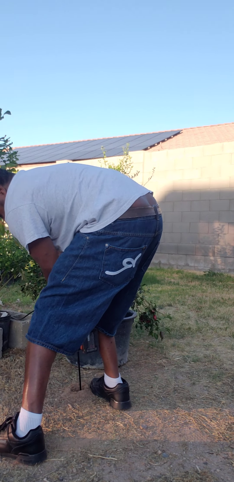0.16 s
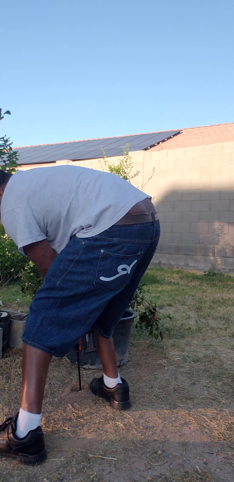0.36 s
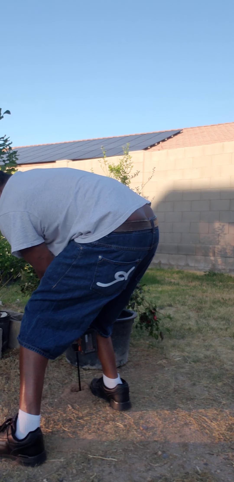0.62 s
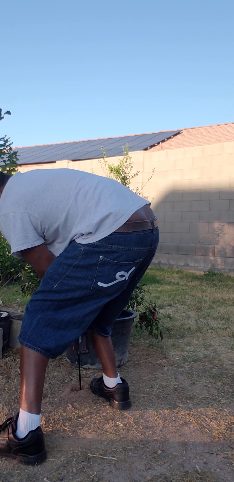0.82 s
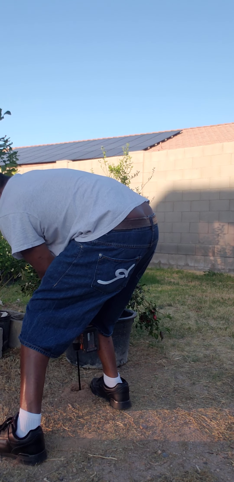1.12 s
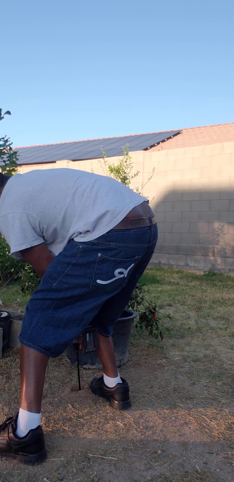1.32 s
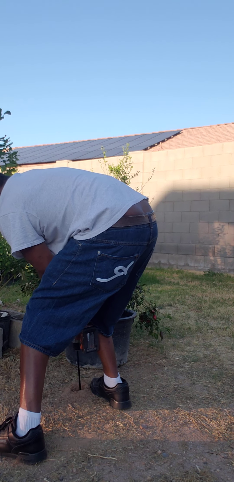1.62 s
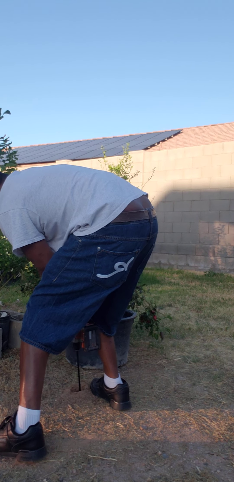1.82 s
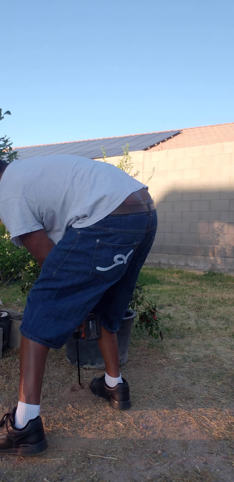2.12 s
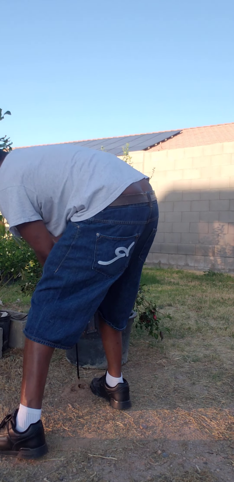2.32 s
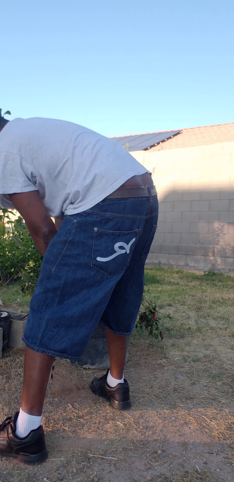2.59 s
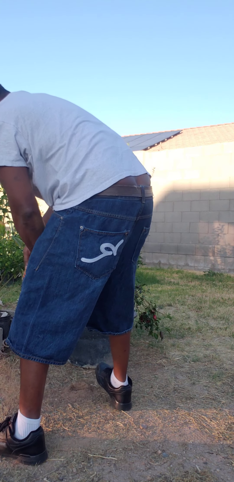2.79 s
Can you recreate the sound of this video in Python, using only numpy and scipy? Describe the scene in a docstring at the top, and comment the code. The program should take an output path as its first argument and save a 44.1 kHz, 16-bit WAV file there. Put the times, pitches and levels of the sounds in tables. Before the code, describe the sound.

A cordless drill grinds an auger into hard dry soil, spins free and clicks off.

```python
"""A machine hums and a far engine drones in a walled yard; a tool clicks as it is handled.
Then a cordless drill whirrs up and turns an auger in hard dry soil. Grit scrapes and rings the steel bit,
earth crumbles, a few stones crack and the bit squeaks on them, until it spins free and stops with a click.
A shoe scuffs the dirt. The wall sends a faint, quick echo of the work back to the microphones."""
import sys
import numpy as np
from scipy import signal
from scipy.fft import rfft, irfft, next_fast_len
from scipy.io import wavfile

SR = 44100
rng = np.random.default_rng(int(sys.argv[2]) if len(sys.argv) > 2 else 0)


def transcribe(signal):
    """Save signal, clipped to [-1, 1], as a 16-bit WAV file at the path in sys.argv[1]."""
    frames = np.atleast_2d(signal).T
    limited = np.clip(frames, -1, 1)
    pcm = np.round(limited * 32767).astype(np.int16)
    wavfile.write(sys.argv[1], SR, pcm)


N = 130095
T = np.arange(N) / SR
SIZE = 2 * next_fast_len(N // 2 + 8192)
HZ = np.maximum(np.arange(SIZE // 2 + 1) * SR / SIZE, 1)
GRAINS_PER_S, CRUMB_SPREAD_DB, BURST_ATTACK_S = 14000, 2.5, 0.00082

# Bright scraping grit and duller crumbling earth. Each row: frequency in Hz, relative level in dB.
GRIT_COLOUR = [(300, -38), (900, -32.5), (1800, -10), (2400, -16), (3300, -5.5), (3900, -5), (4600, 0),
               (5200, -2), (5700, -6.5), (6500, -7.5), (8200, -24), (9400, -11.5), (11000, -18),
               (13800, -21)]
CRUMB_COLOUR = [(120, -5.5), (300, 1), (450, 7), (700, -2.5), (950, 0), (1200, 4), (1450, -1.5),
                (1700, -5.5), (2400, -1.5), (4000, 1), (9000, -46)]
# The ground's dull knock. Each row: frequency in Hz, width in Hz, gain in dB.
THUD_MODES = [(193, 97, -15), (446, 64, -9), (675, 155, -2), (1030, 270, -5.5)]


def from_db(db):
    """Decibels to gain."""
    return 10 ** (np.asarray(db) / 20)


def rms_one(x):
    """Scale to an rms of one."""
    return x / np.sqrt(np.mean(x ** 2) + 1e-20)


def gain_in_time(rows):
    """A level curve as a gain at every sample, silent before and after."""
    s, db = np.transpose(rows)
    return from_db(np.interp(T, s, db)) * (T >= s[0]) * (T <= s[-1])


def over_hz(points):
    """A table joined by straight lines in log frequency."""
    hz, value = np.transpose(points)
    return np.interp(np.log(HZ), np.log(hz), value)


def swell(s, width_s):
    """A smooth rise and fall around a moment."""
    return np.exp(-((T - s) / width_s) ** 2 / 2)


def burst(s, decay_s):
    """A quick rise and an exponential fall."""
    age = np.maximum(T - s, 0)
    return np.minimum(age / BURST_ATTACK_S, 1) * np.exp(-np.minimum(age / decay_s, 50))


def drift(rate_hz):
    """Random wander with an rms of one, mostly slower than the given rate."""
    return rms_one(irfft(rfft(rng.standard_normal(SIZE)) / (1 + (HZ / rate_hz) ** 2))[:N])


def colour(x, spectrum):
    """Causal filter of the given colour that keeps the power of white noise."""
    cepstrum = irfft(np.log(rms_one(from_db(over_hz(spectrum)))))
    cepstrum[1:SIZE // 2] *= 2
    cepstrum[SIZE // 2 + 1:] = 0
    return irfft(rfft(x, SIZE) * np.exp(rfft(cepstrum)))[..., :N]


def resonate(x, hz, width_hz):
    """One resonance."""
    r = np.exp(-np.pi * width_hz / SR)
    return signal.lfilter([1, 0, -1], [1, -2 * r * np.cos(2 * np.pi * hz / SR), r * r], x)


def noise():
    """Two unrelated white noises."""
    return rng.standard_normal((2, N))


def narrow_noise(hz, width_hz):
    """Noise twice through one resonance."""
    return rms_one(resonate(resonate(noise(), hz, width_hz), hz, width_hz))


def grains(per_s, spread_db):
    """Random tiny impacts, many weak and a few strong."""
    sizes = from_db(spread_db * np.minimum(rng.exponential(1, N), 5))
    return rms_one((rng.random(N) < per_s / SR) * sizes * rng.choice([-1, 1], (2, N)))


def strike(blows, modes):
    """Blows, each a time in seconds and a level in dB, ring a body's modes; all mid, no side."""
    hits = np.zeros(N)
    for s, db in blows:
        hits[int(s * SR)] += from_db(db)
    ring = sum((-1) ** k * from_db(db) * resonate(hits + 1e-18, hz, width)
               for k, (hz, width, db) in enumerate(modes))
    return np.array([ring / 2, np.zeros(N)])


def delayed(x, s):
    """The signal s seconds later."""
    return irfft(rfft(x, SIZE) * np.exp(-2j * np.pi * HZ * s))[:N]


def at_microphones(pair):
    """Mid and side become left and right: alike in the bass, diffuse in the treble, leaning left."""
    # Each row: frequency in Hz, likeness of left and right (1 or more is fully alike).
    likeness = [(70, 1.7), (140, 0.83), (700, 0.86), (1600, 0.74), (2600, 0), (5000, -0.16), (15000, 0.12)]
    # Each row: frequency in Hz, left minus right in dB.
    balance = [(60, 3.5), (99, -2.5), (160, 1.5), (270, -0.5), (450, 5), (1220, 6.5), (3330, -0.5),
               (5500, 2)]
    mid, side = rfft(pair, SIZE)
    alike, sign = np.clip(over_hz(likeness), -1, 1), np.array([[1], [-1]])
    both = np.sqrt((1 + alike) / 2) * mid + sign * np.sqrt((1 - alike) / 2) * side
    return irfft(both * from_db(sign * over_hz(balance) / 2))[:, :N]


def yard_air():
    """Low rumble and faint hiss all around; the rumble swells once, briefly."""
    # Each row of both: frequency in Hz, relative level in dB.
    rumble_colour = [(12, -51), (26, -42), (37, 9), (60, -2.5), (115, -2.5), (170, -7), (250, -12.5),
                     (350, -23), (650, -38), (950, -26.5), (1300, -41.5), (3000, -74), (8000, -87)]
    hiss_colour = [(1000, -11), (2800, -12.5), (3600, -2), (4350, -11.5), (5100, 1), (5900, -19.5),
                   (6400, -13), (8000, -24.5), (12000, -14), (15500, -16.5)]
    rumble = from_db(-53) * colour(noise(), rumble_colour)
    hiss = from_db(-74) * colour(noise(), hiss_colour)
    bump = from_db(-46.5) * narrow_noise(hz=103, width_hz=48) * swell(s=1.23, width_s=.05)
    return at_microphones(rumble + hiss + bump)


def far_engine():
    """In the distance an engine drones on one low tone that glides up, then sinks and fades."""
    # Each row: time in seconds, pitch in Hz, rms level in dB.
    glide = [(0, 54.55, -67), (.35, 56.53, -47), (.7, 62.27, -45.5), (1.1, 65.1, -43), (1.32, 62.7, -50.5),
             (1.48, 62.37, -42.5), (1.8, 57.14, -48.5), (2.15, 52.5, -58), (2.55, 43.66, -61),
             (2.95, 41.3, -65)]
    s, hz, db = np.transpose(glide)
    phase = 2 * np.pi * np.cumsum(np.interp(T, s, hz)) / SR
    return np.sqrt(2) * from_db(np.interp(T, s, db)) * np.sin(phase)


def machine_hum(waver_db=1.0):
    """Behind the work a machine hums at a steady pitch, each tone wavering a little in level."""
    # Each row: frequency in Hz, rms level in dB.
    tones = [(75.4, -52.5), (150.8, -70.5), (263.8, -75.5), (942, -79)]
    return np.sqrt(2) * sum(from_db(db + waver_db * drift(0.73)) * np.sin(2 * np.pi * hz * T)
                            for hz, db in tones)


def shoe_scuff():
    """A soft crunch of earth and grit under a shifting sole."""
    crunch = grains(GRAINS_PER_S, CRUMB_SPREAD_DB) * swell(s=2.905, width_s=0.023)
    return from_db(-56.5) * colour(crunch, CRUMB_COLOUR) + from_db(-52.5) * colour(crunch, GRIT_COLOUR)


def tool_clicks():
    """Handled or stopped, the tool's play closes: a sharp tick, a rattle, a faint knock on the ground."""
    # Each row: start in seconds, tick, rattle and thud levels in dB, rattle decay in seconds.
    clicks = [(0.089, -43, -55, -79, 0.014), (.121, -50, -60.5, -74, 0.021), (.307, -39, -60, -76, 0.0018),
              (2.6803, -12.5, -29, -46.5, 0.0014), (2.697, -42, -42, -49, 0.0058),
              (2.858, -26, -48, -62, 0.0012), (2.89, -26, -64, -48, 0.0015)]
    # Each row: frequency in Hz, relative level in dB.
    click_colour = [(2500, -13.5), (5800, 4.5), (8200, -16), (9800, -9), (12500, -21)]
    contacts, thuds = np.zeros((2, N)), []
    for s, tick_db, rattle_db, thud_db, decay_s in clicks:
        contacts += from_db(rattle_db) * burst(s, decay_s) * noise()
        contacts[0, int(s * SR)] += from_db(tick_db)
        thuds.append((s, thud_db))
    return colour(contacts, click_colour) + strike(thuds, THUD_MODES)


def bit_squeaks(attack_s=0.0045, decay_s=0.0053, wobble=0.0084):
    """Steel sticks and slips on a stone; the third harmonic, near a mode of the bit, can shriek."""
    # Each row: start and hold in seconds, slip rate in Hz, fundamental and overtone gains in dB.
    squeaks = [(1.114, 0.044, 1479, -48, -57), (1.393, 0.0078, 1390, -41.5, -18.5)]
    # Each row: multiple of the slip rate, relative level in dB.
    harmonics = [(2, -23.5), (3, -1), (4, -26), (6, -27.5), (7, -22), (8, -28.5)]
    sound = np.zeros(N)
    for s, hold_s, hz, db, overtones_db in squeaks:
        age = np.maximum(T - s, 0)
        shape = np.minimum(age / attack_s, 1) * np.exp(-np.clip((age - hold_s) / decay_s, 0, 50))
        phase = 2 * np.pi * np.cumsum(hz * (1 + wobble * drift(190))) / SR
        overtones = sum(from_db(level_db) * np.sin(k * phase) for k, level_db in harmonics)
        sound += shape * (from_db(db) * np.sin(phase) + from_db(overtones_db) * overtones)
    return sound


def stone_cracks():
    """Stones and clods fracture with a bright snap and a darker crunch; the jolt knocks ground and shaft."""
    # Each row: start in seconds, snap, crunch, thud and clank levels in dB, fracture decay in seconds.
    cracks = [(0.9095, -24, -41, -25.5, -13.5, 0.0028), (1.2734, -23, -36, -35.5, -25, 0.0021),
              (1.2854, -47, -26, -28, -31, 0.0029), (1.3025, -17.5, -17, -21, -20, 0.0021),
              (1.332, -50, -30, -40, -37, 0.0032), (1.6499, -29.5, -25.5, -48, -38, 0.0038),
              (1.668, -51, -31.5, -35, -32, 0.011), (1.76, -41, -42, -37.5, -32, 0.0033)]
    # Each row of both: frequency in Hz, relative level in dB.
    snap_colour = [(500, -27), (2500, -11), (4600, 5), (6300, -11.5), (8300, -13), (9800, -3), (15000, -28)]
    crunch_colour = [(300, -18), (900, -13.5), (1250, -3.5), (3000, 4.5), (4200, 9), (6500, -29)]
    # The shaft's hollow clank, damped by the soil. Each row: frequency in Hz, width in Hz, gain in dB.
    clank_modes = [(1590, 300, -6.5), (2120, 200, -8), (2580, 150, -5), (4370, 120, -6), (5610, 140, -6.5)]
    snap, crunch = np.zeros((2, N))
    thuds, clanks = [], []
    for s, snap_db, crunch_db, thud_db, clank_db, decay_s in cracks:
        snap += from_db(snap_db) * burst(s, decay_s)
        crunch += from_db(crunch_db) * burst(s, decay_s)
        thuds.append((s + BURST_ATTACK_S, thud_db))
        clanks.append((s + BURST_ATTACK_S, clank_db))
    fractures = rng.choice([-1, 1], (2, 2, N))
    knocks = strike(thuds, THUD_MODES) + strike(clanks, clank_modes)
    return colour(snap * fractures[0], snap_colour) + colour(crunch * fractures[1], crunch_colour) + knocks


def grinding():
    """Grit scrapes along the steel in small clumps and sets it ringing; duller crumbs break off."""
    # How hard the bit grinds and the earth crumbles. Each row of both: time in seconds, level in dB.
    grit_level = [(.78, -65), (.835, -48), (.9, -45), (.985, -38), (1.03, -41.5), (1.095, -33),
                  (1.17, -39.5), (1.24, -44), (1.285, -28.5), (1.33, -38), (1.38, -34), (1.43, -40.5),
                  (1.51, -36.5), (1.6, -45.5), (1.645, -37.5), (1.672, -35.5), (1.7, -38), (1.75, -35.5),
                  (1.83, -39.5), (1.888, -35), (1.908, -47.5), (1.95, -52)]
    crumb_level = [(.8, -87), (.85, -81), (.9, -59), (.94, -46), (1.0, -57), (1.14, -51), (1.23, -67),
                   (1.3, -47), (1.345, -50), (1.38, -45.5), (1.43, -57.5), (1.51, -54), (1.6, -68),
                   (1.675, -46), (1.71, -57.5), (1.76, -56.5), (1.82, -56), (1.88, -57), (1.94, -63)]
    # The steel bit's ring. Each row: frequency in Hz, width in Hz, level against the grit in dB.
    bit_modes = [(1440, 46, -22.5), (4350, 17, -19), (4520, 47, -18.5), (4800, 12, -16.5), (4950, 58, -17)]
    grit = grains(GRAINS_PER_S, spread_db=0.5) * from_db(1.08 * drift(39))
    ringing = sum(from_db(db + 2.6 * drift(3.7)) * rms_one(resonate(grit, hz, width))
                  for hz, width, db in bit_modes)
    scrape = (colour(grit, GRIT_COLOUR) + ringing) * gain_in_time(grit_level)
    crumbs = grains(per_s=2500, spread_db=CRUMB_SPREAD_DB) * from_db(2 * drift(41))
    return scrape + colour(crumbs * gain_in_time(crumb_level), CRUMB_COLOUR)


def drill(spin_up_at_s=0.81, spin_up_length_s=0.093, dull_hz=7400):
    """Motor, fan and gears whirr, dull until up to speed, with a thin whine and, running free, a ring."""
    # Each row of all three: time in seconds, level in dB.
    whirr_level = [(.72, -80), (.76, -58), (.84, -43), (1.9, -51), (1.96, -45.5), (2.1, -44), (2.64, -47.5),
                   (2.7, -45.5), (2.73, -54), (2.84, -57.5), (2.95, -67)]
    whine_level = [(.73, -78), (.79, -78), (1.1, -61), (1.93, -79), (2.06, -57), (2.4, -65), (2.73, -78)]
    ring_level = [(1.9, -61), (2.24, -44), (2.4, -52.5), (2.7, -52.5)]
    # Each row: frequency in Hz, relative level in dB.
    whirr_colour = [(550, -15), (900, -8.5), (1300, -11.5), (3100, -10), (3550, -2), (4800, 1.5),
                    (6600, -3.5), (8200, -18), (9400, -10), (11000, -17.5), (13800, -15)]
    bright = colour(noise() * from_db(0.88 * drift(76)), whirr_colour)
    dull = signal.sosfiltfilt(signal.butter(4, dull_hz, fs=SR, output="sos"), bright)
    speed = np.clip((T - spin_up_at_s) / spin_up_length_s, 0, 1)
    whirr = (dull + speed ** 2 * (bright - dull)) * gain_in_time(whirr_level)
    ring = narrow_noise(hz=5180, width_hz=590) * gain_in_time(ring_level)
    whine = narrow_noise(hz=15200, width_hz=580) * gain_in_time(whine_level)
    return whirr + ring + whine


def scene():
    """The work at the hole in front, its echo off the wall with sides swapped, and the yard behind."""
    left_lag_s, wall_delay_s, wall_db = .00005, .029, -17.5
    left, right = at_microphones(drill() + grinding() + stone_cracks() + tool_clicks() + shoe_scuff())
    direct = np.array([delayed(left, left_lag_s), right])
    echo = np.array([delayed(right, wall_delay_s), delayed(left, wall_delay_s)])
    return direct + from_db(wall_db) * echo + bit_squeaks() + far_engine() + machine_hum() + yard_air()


def record(dry):
    """The highest treble is cut steeply."""
    cutoff_hz = 15850
    return signal.sosfilt(signal.ellip(12, .1, 80, cutoff_hz, fs=SR, output="sos"), dry)


dry = scene()
out = record(dry)
transcribe(out)
```